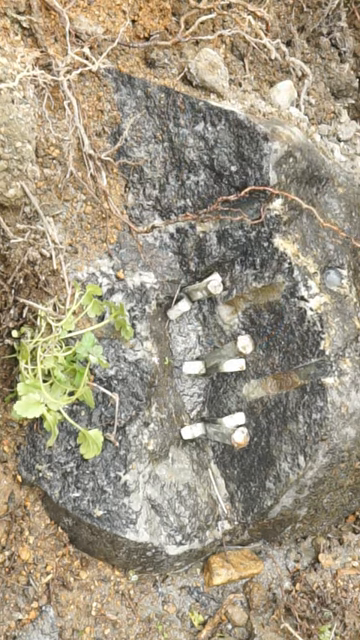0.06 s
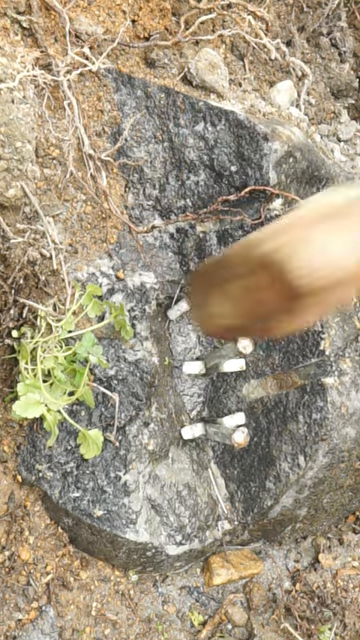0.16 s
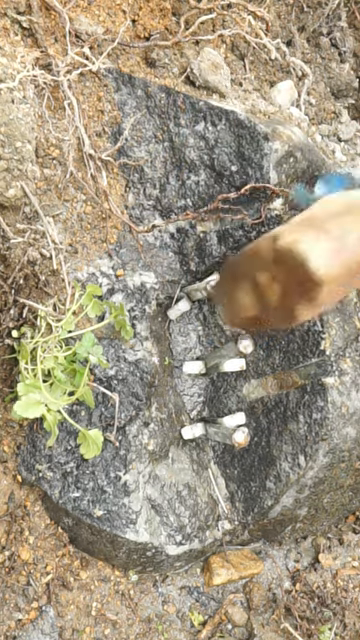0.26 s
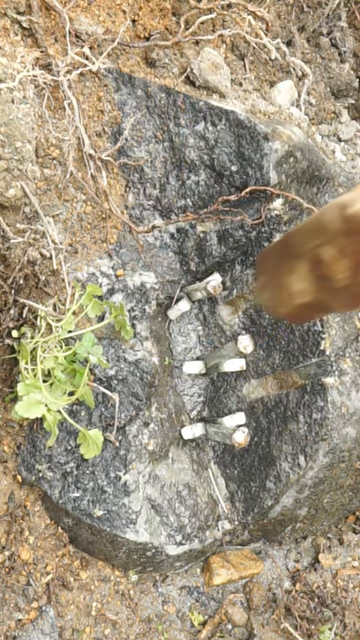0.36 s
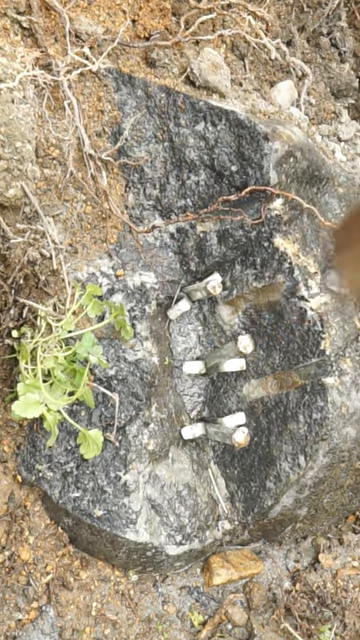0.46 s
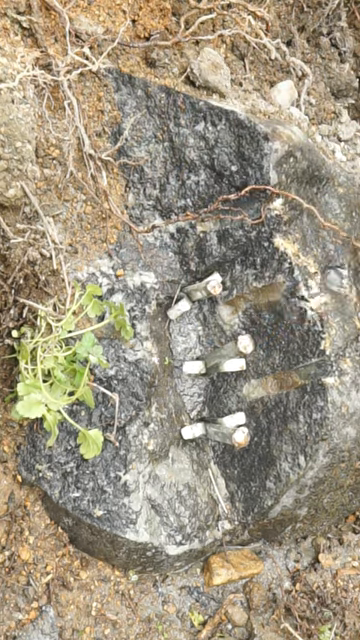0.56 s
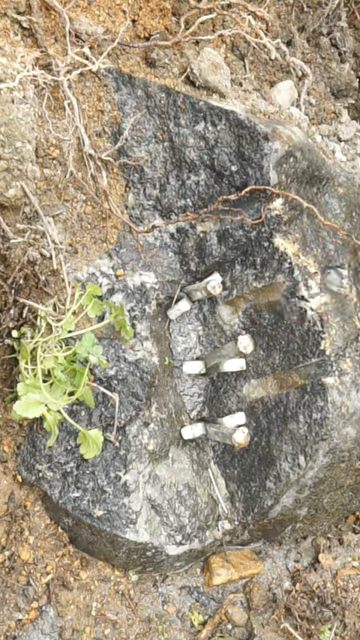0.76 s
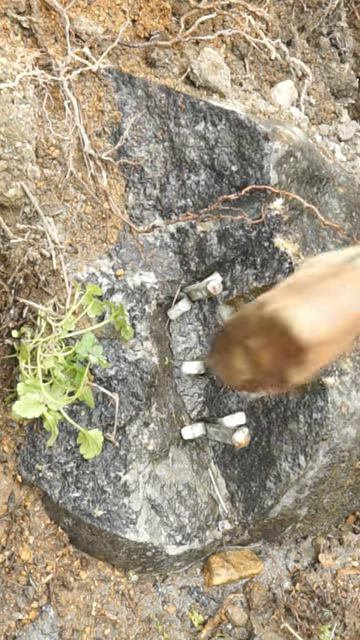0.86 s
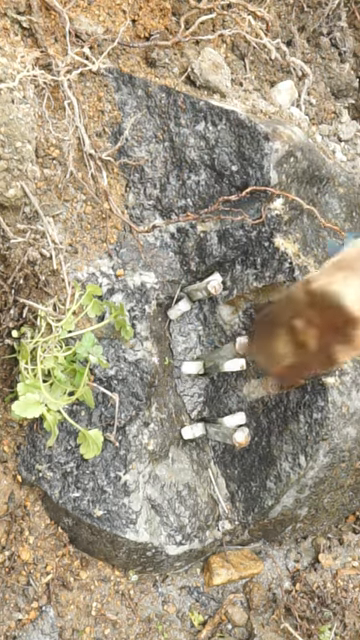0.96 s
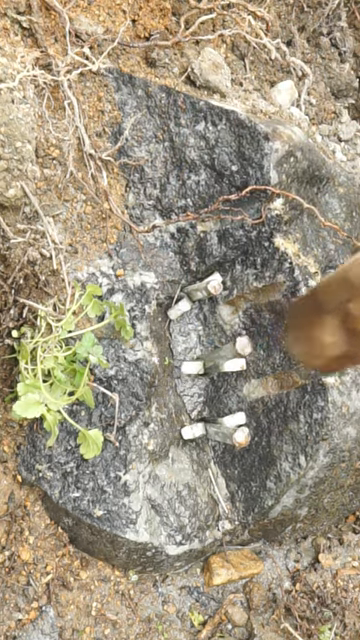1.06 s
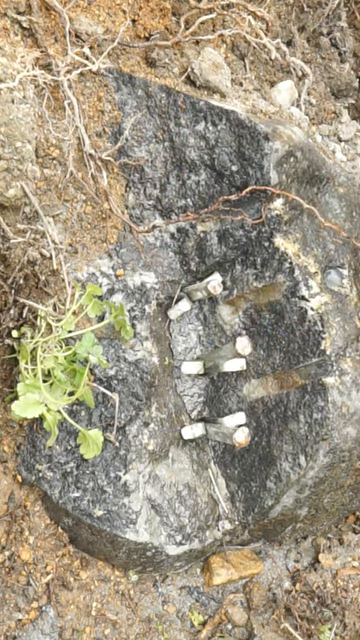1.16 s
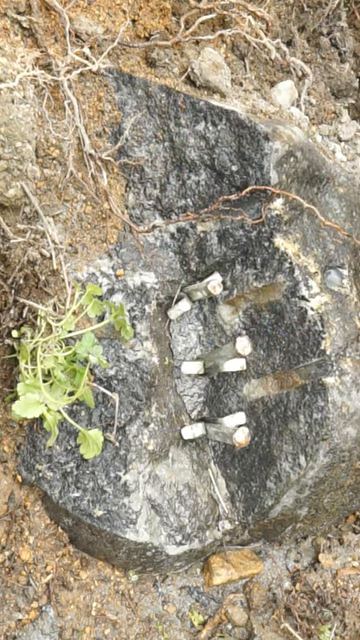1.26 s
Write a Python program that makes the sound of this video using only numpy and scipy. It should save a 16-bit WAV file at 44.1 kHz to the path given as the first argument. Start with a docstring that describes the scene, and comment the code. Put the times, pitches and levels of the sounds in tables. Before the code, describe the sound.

Two sharp hammer blows on steel wedges in stone, close up, each with a short outdoor echo

```python
"""Hammer blows on steel wedges in stone

A hammer strikes two steel wedges set in a garden boulder, one blow each, close by.
Each blow sums damped modes (bright first touch, then clank), a noise burst (crushed stone) and a low thud.
Convolution with decaying noise gives the diffuse echo; a hollow tone swells after the first blow.
Small ticks and soft low bumps lie around the blows, over the coloured noise of quiet outdoor air."""
import sys
import numpy as np
from scipy import signal
from scipy.fft import rfft, irfft
from scipy.io import wavfile

SR = 44100
rng = np.random.default_rng(int(sys.argv[2]) if len(sys.argv) > 2 else 0)


def store_pcm(level_fs):
    """Save levels as 16-bit WAV."""
    pcm = np.round(np.clip(level_fs, -1, 1) * 32767).astype(np.int16)
    wavfile.write(sys.argv[1], SR, np.atleast_2d(pcm).T)


N = 57330   # length in samples

# The blows, upper wedge then middle wedge. Each row: start in seconds, clank level in dB, crunch level in dB,
# echo of the clank in dB re the clank, echo of the crunch in dB re the crunch, left minus right in dB,
# time until the wedge is driven home in seconds.
BLOW_EVENTS = [(0.2103, 3, -19.5, -1.5, 2.5, -1, .001), (0.8946, 1, -19, -3, 5.5, -1, 0.000598)]
# Modes of the upper wedge and the stone around it. Each row: frequency in Hz, level in dB re the clank,
# 60 dB decay time in seconds.
UPPER_WEDGE_MODES = [(322, -30.5, .02), (590, -31, 0.019), (690, -30.5, 0.019), (852, -32, .011),
                     (1950, -47, 0.021), (2780, -25, 0.002), (5750, -16.5, 0.0065), (6520, -22, 0.012),
                     (7010, -16, 0.025), (7234, -23.5, 0.023), (7850, -17, 0.017), (11370, -9.5, 0.0022),
                     (13140, -23, 0.017), (15000, -23, 0.0068)]
# Modes of the middle wedge and the stone around it. Each row: frequency in Hz, level in dB re the clank,
# 60 dB decay time in seconds.
MIDDLE_WEDGE_MODES = [(280, -31.5, 0.022), (763, -34.5, 0.034), (1340, -37.5, 0.012), (2430, -33.5, 0.019),
                      (2844, -30.5, 0.031), (4540, -10.5, 0.0029), (5060, -13.5, 0.0068), (5510, -15, 0.01),
                      (7250, -16.5, 0.0055), (7730, -23, 0.026), (8850, -9, 0.0031), (11500, -14.5, 0.0069),
                      (12500, -18, .005), (12850, -26, 0.023)]
# Spectrum of the crushed stone. Each row: frequency in Hz, relative density in dB per Hz.
CRUNCH_SPECTRUM = [(100, -18.5), (300, -12), (480, -14), (800, -9.5), (1100, -6), (1650, -8), (2300, -1),
                   (3000, -5.5), (3700, -5.5), (5000, 0.5), (8000, -1.5), (10000, -3.5), (11500, -3),
                   (13000, 0.5), (14000, -2.5), (16000, -4)]
# Echo of the surroundings. Each row: frequency in Hz, energy in dB re the sound that excites it,
# 60 dB decay time in seconds.
ECHO_BANDS = [(60, -1.5, .6), (220, -2, 0.56), (600, -0.5, 0.76), (1120, -7.5, 0.67), (2200, -7.5, 0.77),
              (4500, -10.5, 0.56), (6000, -15.5, 0.47), (7700, -6, 0.48), (11000, -19, .34),
              (13000, -10, 0.45), (16200, -14.5, 0.19)]
# Likeness of the echo at the two ears. Each row: frequency in Hz, left-right correlation from 0 to 1.
ECHO_CORRELATION = [(100, 1), (500, 0.94), (1500, .3), (5000, .2), (15000, .2)]
# Ticks of grit and steel. Each row: start in seconds, level in dB before the low cut, ring frequency in Hz,
# left minus right in dB, grit in dB re the ring.
TICK_EVENTS = [(0.0637, -34, 2640, -6, 0.5), (0.6955, -46, 2440, 0, -10.5), (0.7183, -47, 2250, 3, -19),
               (0.7388, -51, 3450, 2, -6.5), (0.942, -55, 5240, 6, -4)]
# Spectrum of the grit in a tick. Each row: frequency in Hz, relative density in dB per Hz.
TICK_GRIT_SPECTRUM = [(1300, -41), (2300, 0), (5000, 4.5), (7500, -0.5), (10000, 8), (16000, -16)]
# Soft low bumps. Each row: start in seconds, level in dB, frequency in Hz.
BUMP_EVENTS = [(0.111, -56.5, 190), (0.161, -52.5, 185), (0.189, -59.5, 195), (0.363, -39.5, 242),
               (0.459, -41.5, 200), (0.478, -53, 184), (0.503, -50, 276), (0.523, -57, 150),
               (0.781, -49, 134.8), (1.012, -46.5, 226), (1.038, -48.5, 260)]
# Spectrum of the air. Each row: frequency in Hz, relative density in dB per Hz.
AIR_SPECTRUM = [(30, -27.5), (120, -16.5), (400, -6.5), (900, -0.5), (1600, -6.5), (2500, -2.5),
                (4000, -6.5), (8000, -8.5), (15500, -13.5)]
# Course of the air. Each row: time in seconds, level in dB re AIR_DB.
AIR_COURSE = [(0, -0.5), (0.182, 2), (.55, -5), (.66, -2.5), (.71, -2.5), (.8, -1.5), (.86, 0.5),
              (1.15, -4.5), (1.3, -2.5)]
# Spectrum of the low rumble. Each row: frequency in Hz, relative density in dB per Hz.
RUMBLE_SPECTRUM = [(25, 1.5), (50, 0.5), (80, 4), (130, 5), (200, -1.5), (300, -8), (600, -26), (2000, -58)]
# Course of the low rumble. Each row: time in seconds, rms level in dB before the final low cut.
RUMBLE_COURSE = [(0, -63), (.12, -70), (.35, -51), (.43, -64.5), (.55, -57), (.63, -69.5), (0.702, -64),
                 (.8, -63.5), (1.0, -70), (1.14, -93), (1.3, -107.5)]

TOUCH_ABOVE_HZ = 10000   # the highest modes sound at first touch, the rest as the wedge is driven home
CONTACT_S = 0.00026   # time constant of the steel-on-steel contact
MODE_PAN_DB, MODE_PHASE_RAD = -1.8, 0.33   # random spread: each mode reaches the two ears a little differently
CRUNCH_ATTACK_S, CRUNCH_T60_S = 0.00046, 0.02
THUD_HZ, THUD_DB, THUD_RISE_S = 199, -53.5, 0.0061
ECHO_DELAY_S, ECHO_RISE_S = 0.022, 0.006   # full strength is reached at the delay, after a short rise
EARLY_DB, ECHO_HOLD_S = -3.5, 0.039   # level before that rise; time at which the decay begins
HOLLOW_HZ, HOLLOW_DB = 663.4, -38   # level before the slow build-up
HOLLOW_RISE_S, HOLLOW_T60_S = 0.09, 0.53
TICK_T60_S, TICK_GRIT_T60_S = 0.005, 0.007
BUMP_RISE_S = 0.0033
AIR_DB = -62.5
AIR_LIKENESS, RUMBLE_LIKENESS, CRUNCH_LIKENESS = 0.25, 0.4, 0.5   # left-right correlations
MIC_LOW_CUT_HZ, CUTOFF_HZ = 109, 15900
OPPOSITE_EARS = np.array([[1], [-1]])   # opposite signs for left and right


def blows():
    """Superposition: each blow is clank, crunch and the boulder's thud, followed by their echo."""
    out = np.zeros((2, N))
    for event, modes in zip(BLOW_EVENTS, (UPPER_WEDGE_MODES, MIDDLE_WEDGE_MODES)):
        s, clank_db, crunch_db, clank_echo_db, crunch_echo_db, pan_db, seat_s = event
        clank = from_db(clank_db) * wedge(modes, seat_s)
        clank = clank + from_db(THUD_DB) * thud(THUD_HZ, THUD_RISE_S)
        echo_source = from_db(clank_echo_db) * clank
        echo_source = echo_source + from_db(crunch_db + crunch_echo_db) * crunch_click()
        tail = echo(echo_source)
        direct = clank + from_db(crunch_db) * crunch()
        add(out, s, direct * panned(pan_db) + tail)
    first_blow_s = BLOW_EVENTS[0][0]
    add(out, first_blow_s, hollow_tone())
    return out


def wedge(modes, seat_s):
    """Modal superposition: a wedge held tight in stone clanks as a sum of damped sinusoids."""
    out = np.zeros((2, N))
    for k, (hz, db, t60) in enumerate(modes):
        # the two ears differ less at low frequencies
        pan, phase = rng.standard_normal(2) * min(hz / TOUCH_ABOVE_HZ * 2, 1)
        delay = seat_s * (hz < TOUCH_ABOVE_HZ)
        contact = 1 - np.exp(-np.maximum(clock() - delay, 0) / CONTACT_S)
        mode = contact * ring(hz, t60, delay, MODE_PHASE_RAD * phase * OPPOSITE_EARS)
        polarity = (-1) ** k
        out += polarity * from_db(db) * panned(MODE_PAN_DB * pan) * mode
    return out


def crunch():
    """Fracture noise: stone crushed against the wedge gives a short, coloured noise burst."""
    t = clock()
    attack = np.minimum(t / CRUNCH_ATTACK_S, 1)
    return coloured_noise(CRUNCH_SPECTRUM, CRUNCH_LIKENESS) * attack * dying(t, CRUNCH_T60_S)


def crunch_click():
    """Impulse equivalence: to excite the echo, a click of the same colour and energy replaces the crunch."""
    spectrum = from_db(at_hz(CRUNCH_SPECTRUM, np.fft.rfftfreq(N, 1 / SR)))
    click = np.roll(irfft(spectrum, N), SR // 1000)   # centred 1 ms after the start
    energy = np.sum(crunch() ** 2) / 2   # mean of the two channels
    return click * np.sqrt(energy / np.sum(click ** 2))


def thud(hz, rise_s):
    """Heavily damped oscillation: a dull knock swells to height 1 and dies away."""
    t = clock()
    swell = (t / rise_s * np.exp(1 - t / rise_s)) ** 2
    return swell * np.sin(2 * np.pi * hz * t)


def echo(x):
    """Diffuse reflection: weaker early scatter, then a dense tail whose treble dies sooner."""
    t, response = clock(), np.zeros((2, N))
    rise = np.clip((t - ECHO_DELAY_S) / ECHO_RISE_S + 1, 0, 1)
    onset = from_db(EARLY_DB * (1 - rise))
    edges = np.geomspace(50, 17000, 18)   # band edges in Hz
    for low, high in zip(edges, edges[1:]):
        hz = np.sqrt(low * high)
        band_pass = signal.butter(2, [low, high], "band", fs=SR, output="sos")
        band = signal.sosfilt(band_pass, stereo_noise(at_hz(ECHO_CORRELATION, hz)))
        shape = onset * dying(np.maximum(t - ECHO_HOLD_S, 0), at_hz(ECHO_BANDS, hz, axis=2))
        unit_energy_shape = shape / np.sqrt(np.sum(shape ** 2))
        response += from_db(at_hz(ECHO_BANDS, hz)) * band * unit_energy_shape
    return signal.fftconvolve(x, response, axes=1)[:, :N]


def hollow_tone():
    """Gradual build-up: a hollow tone grows exponentially towards its own decay curve and fades."""
    build_up = 1 - np.exp(-clock() / HOLLOW_RISE_S)
    return from_db(HOLLOW_DB) * ring(HOLLOW_HZ, HOLLOW_T60_S) * build_up


def ticks():
    """Light impact: a tiny dry contact excites one short ring and a spit of grit noise."""
    out = np.zeros((2, N))
    for s, db, hz, pan_db, grit_db in TICK_EVENTS:
        noise = coloured_noise(TICK_GRIT_SPECTRUM, CRUNCH_LIKENESS)
        grit = from_db(grit_db) * noise * dying(clock(), TICK_GRIT_T60_S)
        add(out, s, from_db(db) * panned(pan_db) * (ring(hz, TICK_T60_S) + grit))
    return low_cut(out, hz=2050)


def bumps():
    """Padded impact: soft knocks around the blows are low, heavily damped oscillations."""
    out = np.zeros((2, N))
    for s, db, hz in BUMP_EVENTS:
        add(out, s, from_db(db) * thud(hz, BUMP_RISE_S))
    return out


def garden():
    """Ambient noise: quiet outdoor hiss and an uneven low rumble, each with its own level course."""
    t = clock()
    air_gain = from_db(AIR_DB + np.interp(t, *np.transpose(AIR_COURSE)))
    air = air_gain * coloured_noise(AIR_SPECTRUM, AIR_LIKENESS)
    rumble_gain = from_db(np.interp(t, *np.transpose(RUMBLE_COURSE)))
    return air + rumble_gain * coloured_noise(RUMBLE_SPECTRUM, RUMBLE_LIKENESS)


def ring(hz, t60, delay=0, phase=0):
    """Free damped vibration: a struck mode is a decaying sinusoid of initial height 1."""
    t = np.maximum(clock() - delay, 0)
    return (t > 0) * np.sin(2 * np.pi * hz * t + phase) * dying(t, t60)


def dying(t, t60):
    """Exponential decay: the level falls by 60 dB in the time t60."""
    return np.exp(-np.log(1000) * t / t60)


def coloured_noise(spectrum, likeness):
    """Spectral shaping: stereo noise is weighted by a given spectrum and scaled to rms 1."""
    weights = from_db(at_hz(spectrum, np.fft.rfftfreq(N, 1 / SR)))
    x = irfft(rfft(stereo_noise(likeness)) * weights, N)
    return x / x.std()


def stereo_noise(likeness):
    """Interaural correlation: a mid-side mix of white noise sets the left-right likeness."""
    mid, side = rng.standard_normal((2, N))
    c = np.clip(likeness, -1, 1)
    return np.sqrt((1 + c) / 2) * mid + np.sqrt((1 - c) / 2) * side * OPPOSITE_EARS


def panned(pan_db):
    """Level difference between ears: left and right gains share the given dB equally."""
    return from_db(pan_db * OPPOSITE_EARS / 2)


def low_cut(x, hz):
    """High-pass filtering of second order."""
    return signal.sosfilt(signal.butter(2, hz, "high", fs=SR, output="sos"), x)


def at_hz(points, hz, axis=1):
    """Logarithmic frequency scale: a table column is interpolated along it."""
    table = np.array(points)
    return np.interp(np.log(np.maximum(hz, 1)), np.log(table[:, 0]), table[:, axis])


def from_db(db):
    """Decibel scale: 20 dB is a tenfold amplitude gain."""
    return 10 ** (np.asarray(db) / 20)


def clock():
    """Uniform sampling: the time in seconds at every sample."""
    return np.arange(N) / SR


def add(out, s, sound):
    """Superposition: a sound is mixed in from a given time on."""
    start = int(s * SR)
    out[:, start:] += sound[..., :N - start]


def scene():
    """Superposition: all sources add at the microphone."""
    return blows() + ticks() + bumps() + garden()


def record(dry):
    """Band limiting: the deep bass and the extreme treble are cut."""
    x = low_cut(dry, MIC_LOW_CUT_HZ)
    top_cut = signal.ellip(10, .1, 80, CUTOFF_HZ, fs=SR, output="sos")   # ripple and stop band in dB
    return signal.sosfilt(top_cut, x)


dry = scene()
out = record(dry)
store_pcm(out)
```